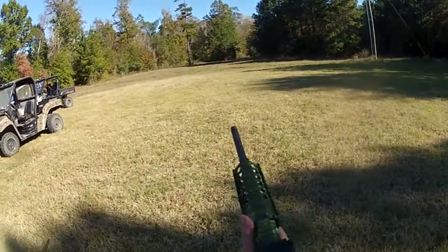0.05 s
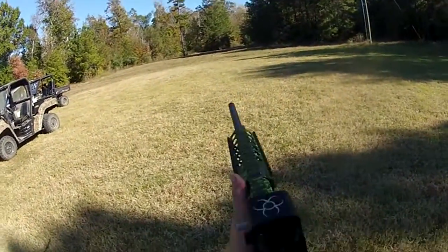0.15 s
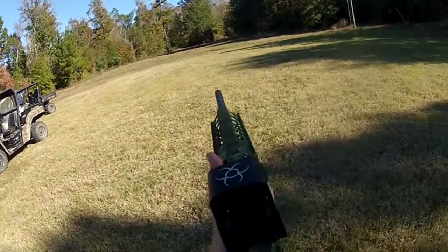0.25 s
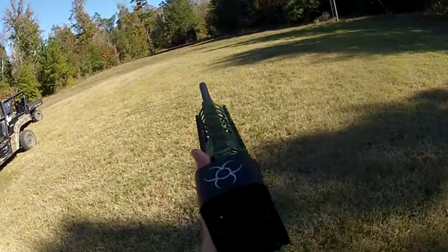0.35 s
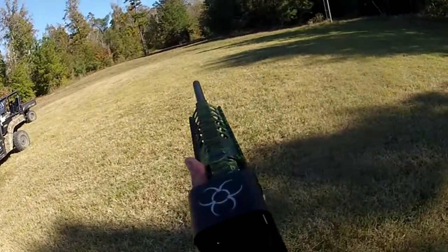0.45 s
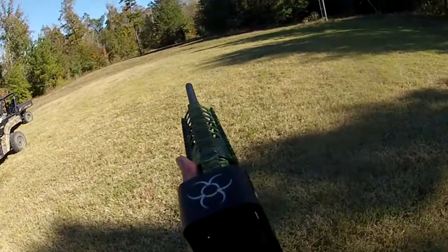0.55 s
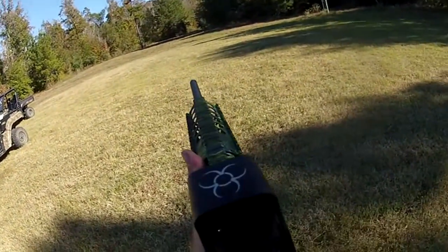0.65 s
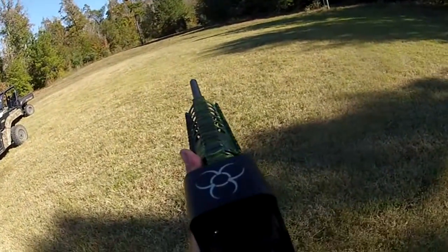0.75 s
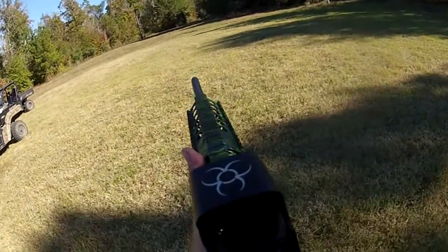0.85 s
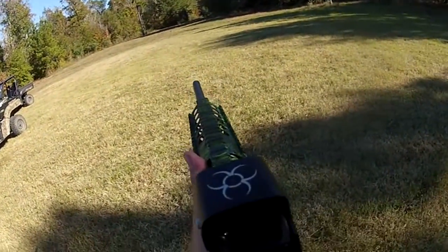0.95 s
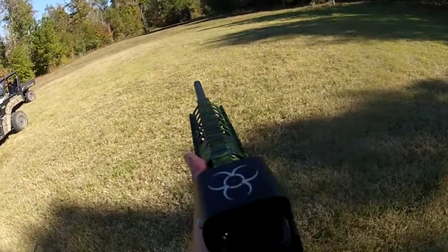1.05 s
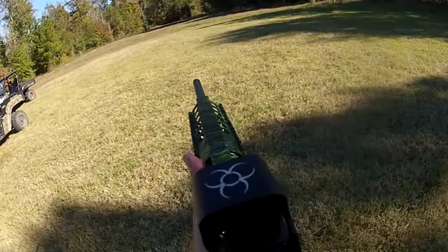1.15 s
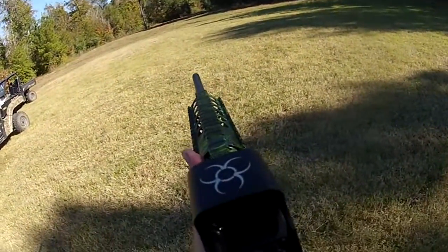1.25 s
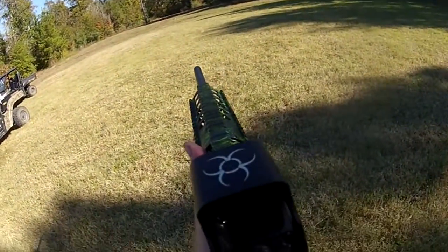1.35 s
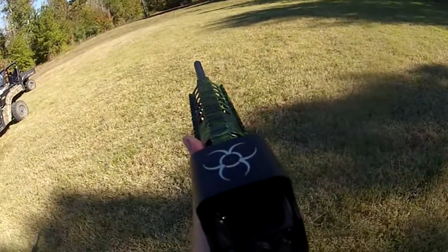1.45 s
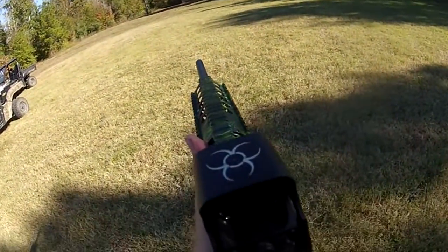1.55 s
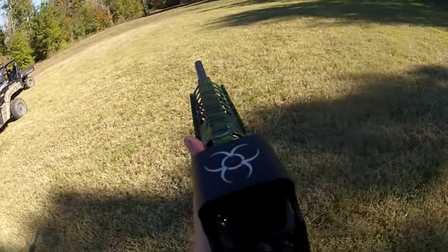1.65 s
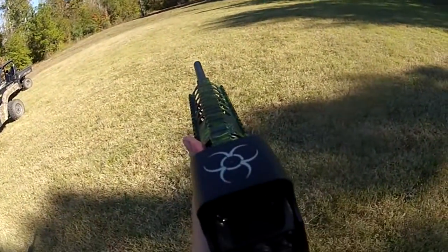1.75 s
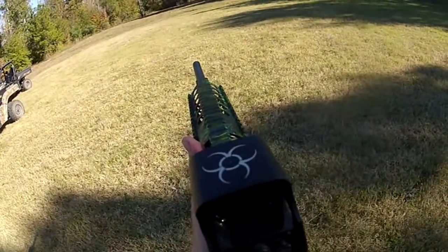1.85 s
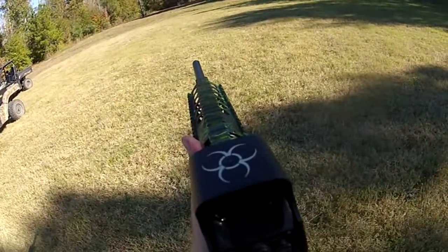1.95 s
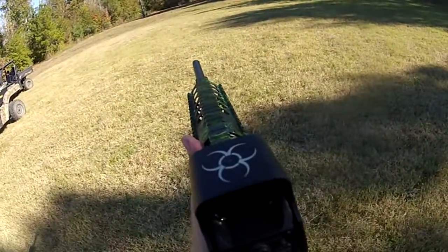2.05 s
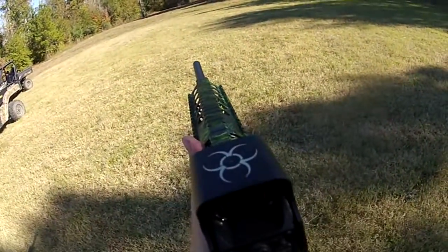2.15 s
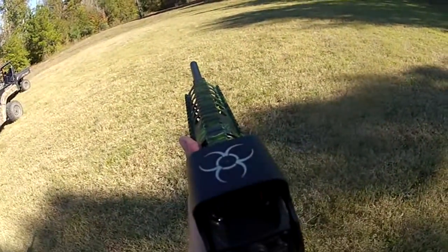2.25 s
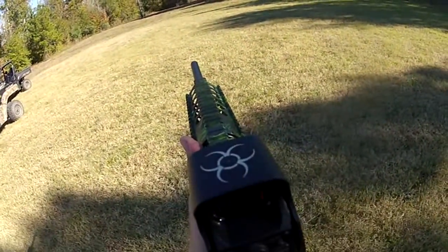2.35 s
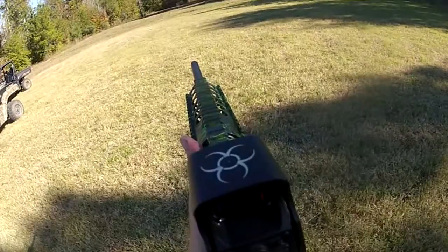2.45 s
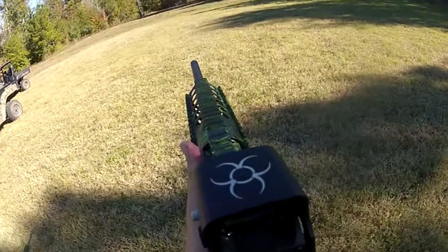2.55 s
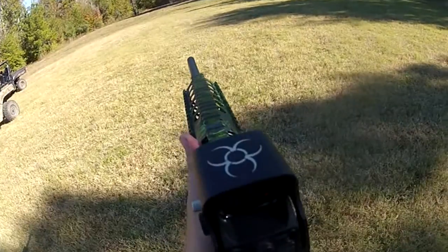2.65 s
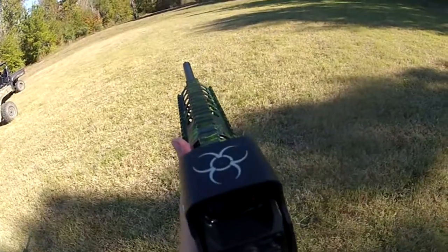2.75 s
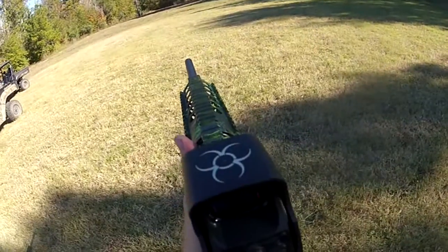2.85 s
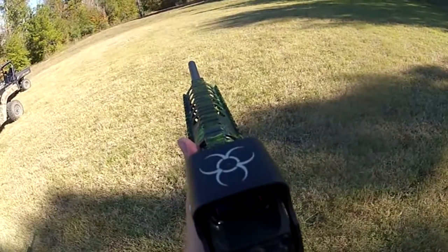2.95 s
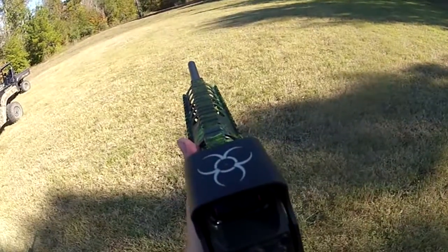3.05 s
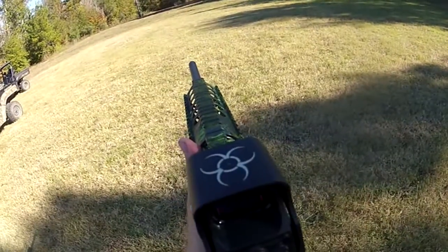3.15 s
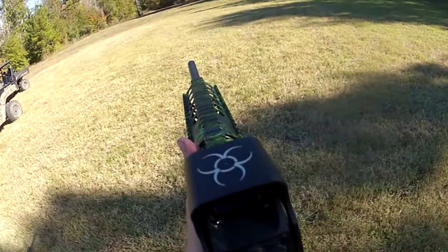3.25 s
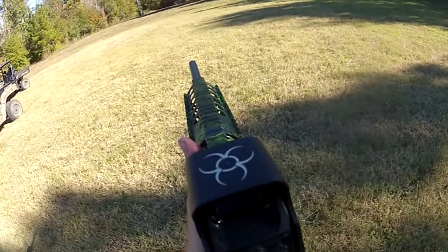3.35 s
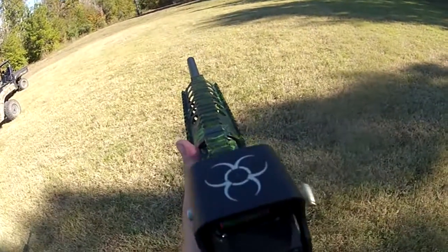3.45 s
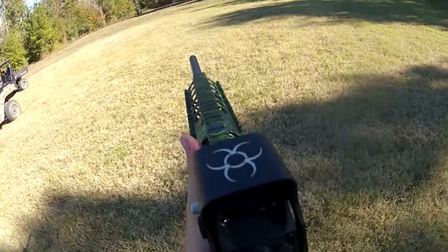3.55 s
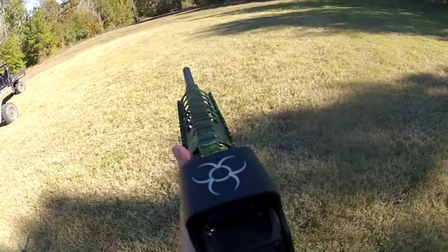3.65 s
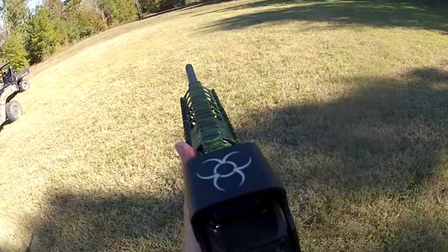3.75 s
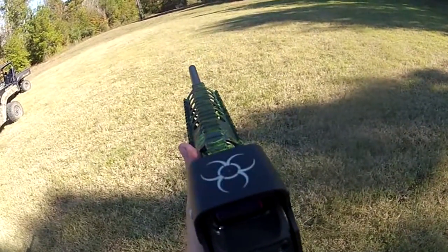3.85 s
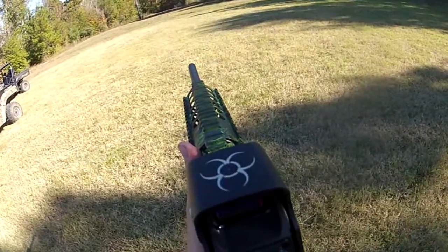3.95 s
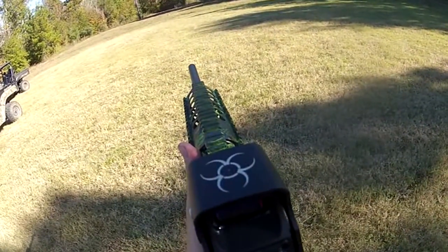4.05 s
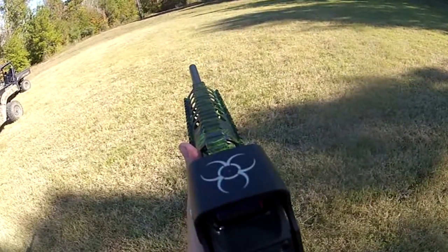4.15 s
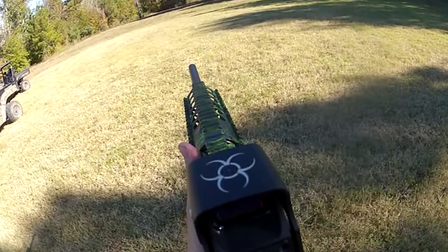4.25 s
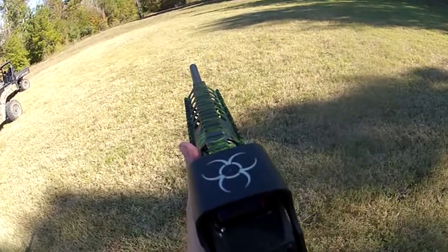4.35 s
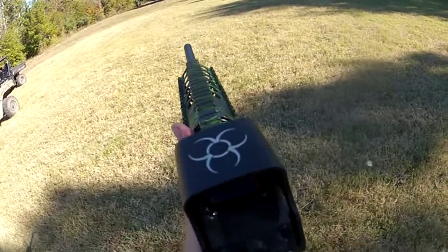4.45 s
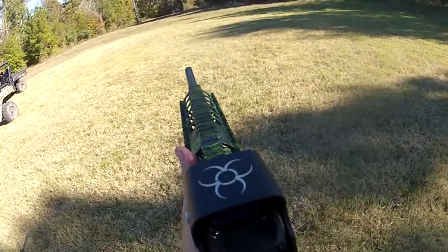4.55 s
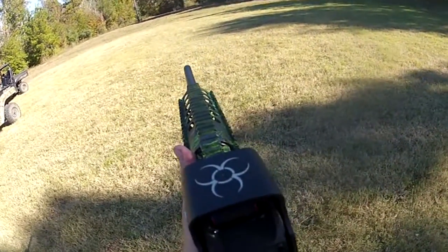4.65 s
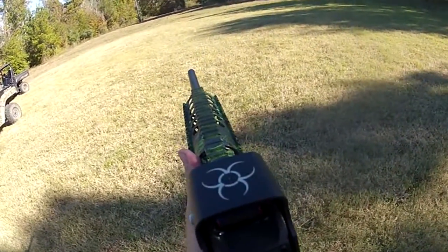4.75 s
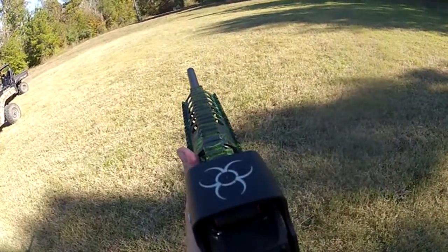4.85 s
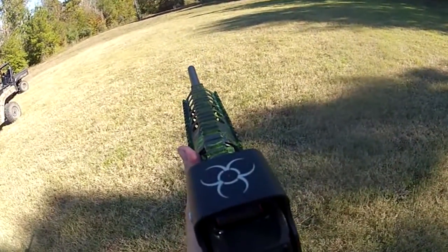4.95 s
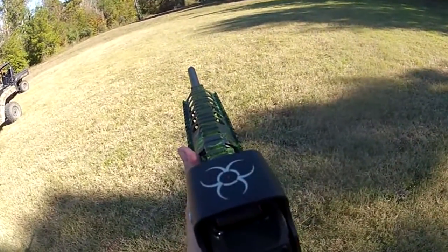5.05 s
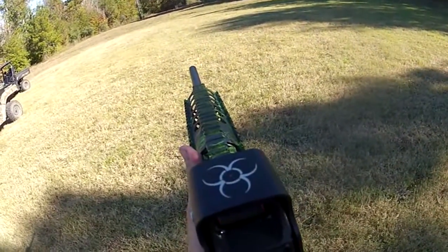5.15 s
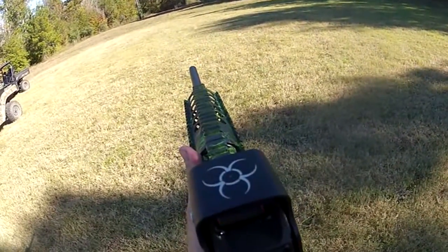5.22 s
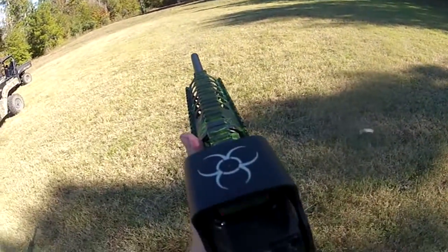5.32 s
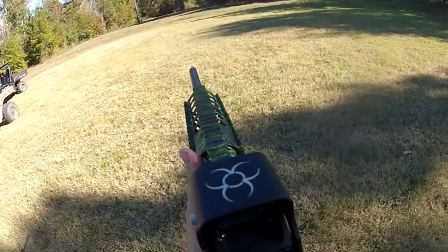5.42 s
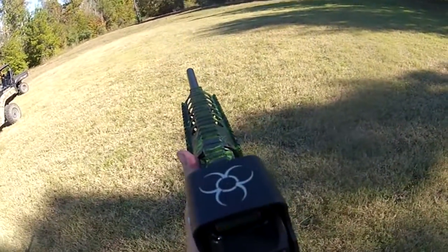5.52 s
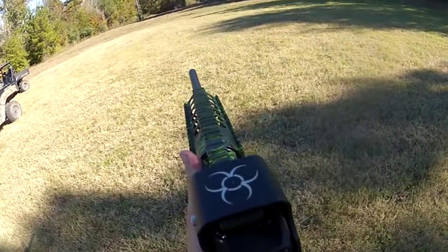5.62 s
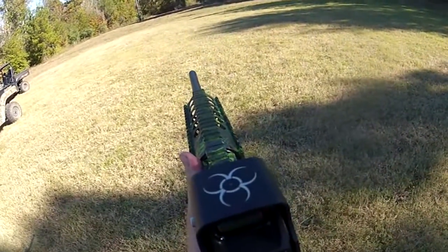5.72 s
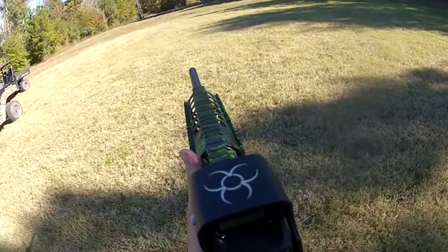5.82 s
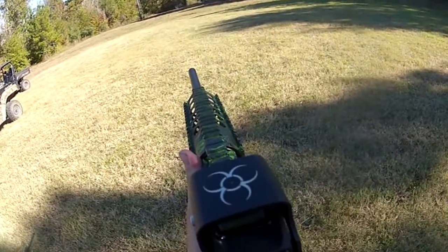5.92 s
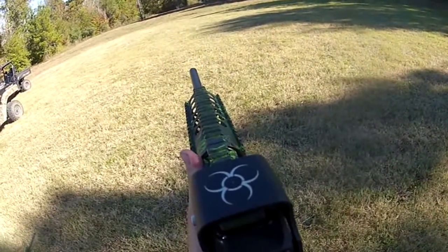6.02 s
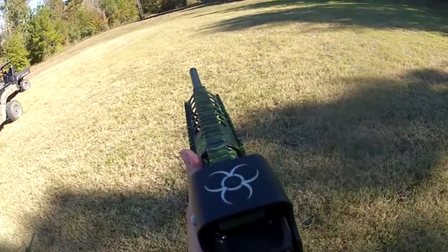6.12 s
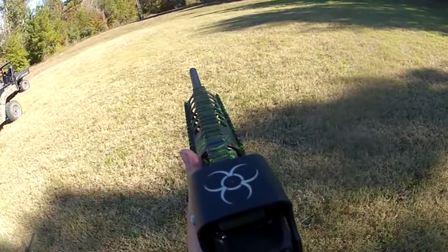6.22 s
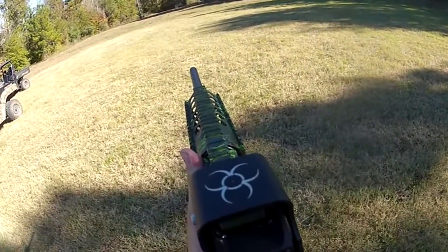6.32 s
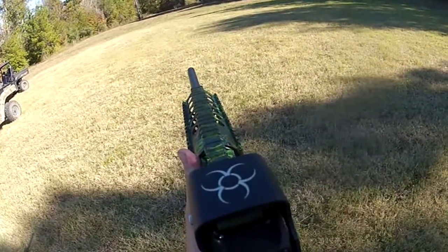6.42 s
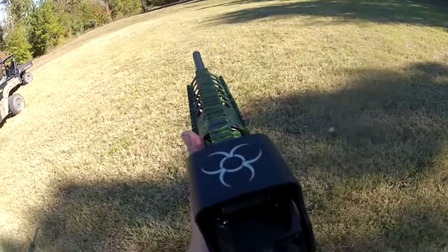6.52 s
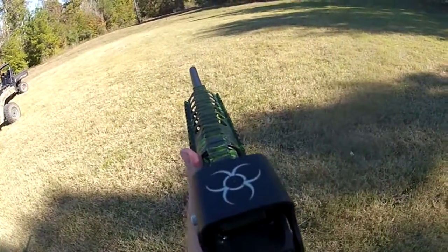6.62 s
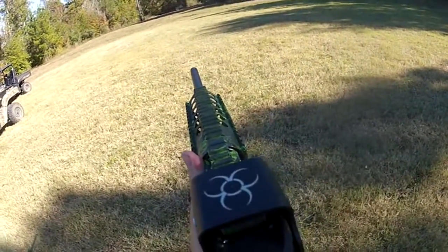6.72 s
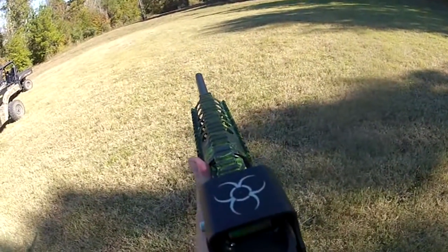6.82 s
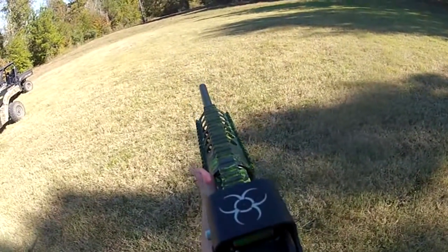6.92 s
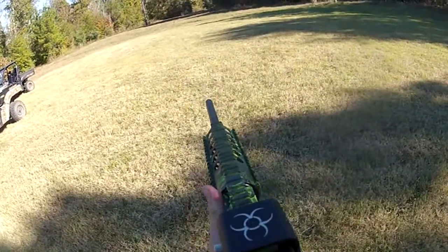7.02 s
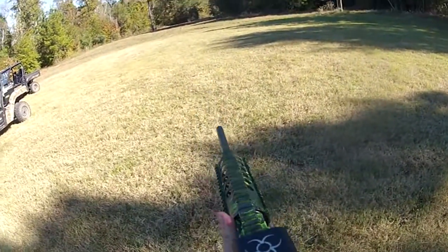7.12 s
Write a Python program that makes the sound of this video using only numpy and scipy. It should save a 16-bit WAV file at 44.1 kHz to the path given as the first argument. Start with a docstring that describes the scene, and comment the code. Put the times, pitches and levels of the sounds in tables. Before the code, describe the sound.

Faint wind rumbles over an open field, with a soft tap and a few small clicks as a rifle is raised. After a pause, the self-loading rifle fires five single shots about a second apart, right in front of a body-worn microphone. Each sharp blast overloads slightly and is followed by the metallic rattle and clack of the bolt, then a long echo from the tree line that dulls as it fades.

```python
"""A light wind rumbles over a mown field. A hand taps a rifle stock; the safety catch ticks.
From 2.6 s the self-loading rifle fires five single shots right in front of a body-worn camera.
Each blast overloads the recorder and the recoil jolts the camera; the bolt runs back, rattles, slams home.
A quarter second after each shot the tree line returns a long echo that dulls as it rolls away."""
import sys
import numpy as np
from scipy import signal
from scipy.fft import rfft, irfft, next_fast_len
from scipy.io import wavfile

SR = 44100
rng = np.random.default_rng(int(sys.argv[2]) if len(sys.argv) > 2 else 0)


def unload_wav(signal):
    """Save mono or channel-first audio to the path in sys.argv[1] as 16-bit WAV at rate SR, clipped to [-1, 1]."""
    wavfile.write(
        sys.argv[1],
        SR,
        np.round(np.clip(np.atleast_2d(signal).T, -1, 1) * 32767).astype(np.int16),
    )


N = 316638
HOLD_HZ = 12000  # recorder's sample-and-hold rate
HZ = np.fft.rfftfreq(4096, 1 / SR)  # grid of the filter curves

# shots: t/s, blast level/dB, blast length/s, boom lift/dB, boom f/Hz, echo level/dB, slap level/dB
SHOTS = [(2.5983, 2, 0.0082, 10.5, 240, 6.5, -3.5), (3.4994, 6.5, 0.0084, 7, 290, 7.5, -6),
         (4.432, 1.5, 0.0073, 14, 104, 9, -2), (5.3219, 2, 0.0081, 14.5, 83.3, 7.5, 1),
         (6.515, 0.5, 0.0096, 4, 590, 7.5, -4.5)]
# bolt slamming home: t/s, level/dB, chatter length/s
SLAMS = [(2.7315, -5, 0.01), (3.6343, -6, 0.011), (4.573, -4.5, 0.0064), (5.4588, -4.5, 0.0081),
         (6.6557, -4.5, 0.0082)]
# camera housing resonances: f/Hz, width/Hz, lift/dB
HOUSING = [(974, 250, 10), (1282, 170, 15), (1793, 190, 11.5), (2190, 285, 9), (2419, 253, 14.5),
           (3445, 210, 5)]


def amp(db):
    return 10 ** (np.asarray(db) / 20)


def unit(x):
    return x / np.sqrt(np.mean(x ** 2) + 1e-20)


def curve_db(points):
    """Spectrum on HZ, interpolated over log frequency."""
    hz, db = np.transpose(points)
    return np.interp(np.log(HZ + 1), np.log(hz + 1), db)


def resonance_db(modes):
    """Summed lift of resonances on HZ."""
    return sum(db / (1 + (2 * (HZ - hz) / width_hz) ** 2) for hz, width_hz, db in modes)


def colour(x, db):
    """Minimum-phase filter; white noise keeps its power."""
    log_gain = np.log(unit(amp(db)))
    log_response = np.conj(signal.hilbert(np.r_[log_gain, log_gain[-2:0:-1]]))
    taps = np.fft.ifft(np.exp(log_response)).real
    return signal.oaconvolve(x, taps)[:len(x)]


def lowpass(x, hz, size):
    """Steep FIR low-pass per channel."""
    taps = signal.firwin(size, hz, window=("kaiser", 8), fs=SR)
    return signal.oaconvolve(x, taps[None], "same", axes=1)


def wander(length, rate_hz):
    """Smooth random curve, RMS 1."""
    step = np.arange(length) * rate_hz / SR
    return unit(np.interp(step, np.arange(4000), rng.standard_normal(4000)))


def add(mix, start_s, sound):
    part = mix[max(round(start_s * SR), 0):][:len(sound)]
    part += sound[:len(part)]


def burst(hold_s, decay_s):
    """Dense tiny impacts: level, then decaying."""
    t = np.arange(SR // 8) / SR
    return rng.choice([-1., 1.], len(t)) * np.exp(-np.maximum(t - hold_s, 0) / decay_s)


def shot_noise(spectrum, gain_db, decay_s):
    """Decaying noise from the instant of each shot."""
    out, t = np.zeros(N), np.arange(2 * SR) / SR
    for shot_s, *_ in SHOTS:
        add(out, shot_s, amp(gain_db) * np.exp(-t / decay_s) * rng.standard_normal(len(t)))
    return colour(out, curve_db(spectrum))


def touches(events, spectrum, gain_db, decay_s):
    """One short click per event."""
    out = np.zeros(N)
    for start_s, db in events:
        add(out, start_s, amp(db + gain_db) * burst(0, decay_s))
    return colour(out, curve_db(spectrum))


def blasts(gain_db=5, rise_s=0.001, fall_s=0.0009, ring_db=-20, ring_decay_s=0.012, boom_octaves=0.6):
    """Turbulent gas bursts from the muzzle, rings briefly and shakes the camera housing."""
    gas_spectrum = [(30, -7), (90, 5), (300, 0.5), (650, -6), (1200, -8.5), (2400, -1), (3200, 2),
                    (5600, 4.5)]  # f/Hz, level/dB
    out, t = np.zeros(N), np.arange(SR // 8) / SR
    for shot_s, db, length_s, boom_db, boom_hz, *_ in SHOTS:
        lift_db = boom_db / (1 + (np.log2((HZ + 1) / boom_hz) / boom_octaves) ** 2)
        shape_db = curve_db(gas_spectrum) + resonance_db(HOUSING) + lift_db
        gas = colour(rng.standard_normal(2 * len(t)), shape_db)[len(t):]
        onset = np.minimum(t / rise_s, 1) ** 2
        after_s = np.maximum(t - length_s, 0)
        release = np.exp(-after_s / fall_s) + amp(ring_db) * np.exp(-after_s / ring_decay_s)
        add(out, shot_s, amp(db + gain_db) * onset * release * gas)
    return out


def action(contact_s=0.0032, hammer_lead_s=0.007, unlock_lead_s=0.012, bounce_loss_db=7, chatter_db=2):
    """The hammer falls; the bolt unlocks, bounces at the rear stop, slams home; the spring rings."""
    # buffer hitting the rear stop: t/s, level/dB, bounce interval/s
    knocks = [(2.6413, -15.5, 0.02), (3.541, -14, .019), (4.475, -18, .019), (5.3616, -16, 0.02),
              (6.5549, -14, 0.023)]
    # bolt and receiver resonances: f/Hz, width/Hz, lift/dB
    steel_modes = [(2320, 100, -14), (3054, 160, 10), (3860, 49, -0.5), (3707, 106, 7), (4070, 890, 10.5),
                   (4690, 130, -0.5), (4800, 111, -14)]
    clack_spectrum = [(60, 1), (250, -1.5), (600, -21), (1500, -12.5), (2200, 3), (2800, 2), (4000, -3.5),
                      (5600, -2)]  # f/Hz, level/dB
    spring_spectrum = [(60, -45.5), (2800, -10.5), (3800, -31), (5300, 17), (5700, 8)]  # f/Hz, level/dB
    steel, spring = np.zeros((2, N))
    for shot_s, *_ in SHOTS:
        add(steel, shot_s - hammer_lead_s, amp(-19) * burst(contact_s, decay_s=0.0017))
    for knock_s, db, bounce_s in knocks:
        for part, unlock_db in (steel, -29), (spring, -22.5):
            add(part, knock_s - unlock_lead_s, amp(unlock_db) * burst(contact_s, decay_s=0.019))
        for k in range(3):
            hit_s, hit_db = knock_s + k * bounce_s, db - k * bounce_loss_db
            for part, part_db in (steel, 0), (spring, -2):
                add(part, hit_s, amp(hit_db + part_db) * burst(contact_s, decay_s=0.0071))
    for slam_s, db, chatter_s in SLAMS:
        blow = burst(chatter_s, decay_s=0.011) + amp(4) * burst(0.001, decay_s=0.002)
        uneven_db = chatter_db * wander(len(blow), rate_hz=690)
        add(steel, slam_s, amp(db - 12 + uneven_db) * blow)
    steel_db = curve_db(clack_spectrum) + resonance_db(steel_modes) + resonance_db(HOUSING)
    return colour(steel, steel_db) + colour(spring, curve_db(spring_spectrum))


def recoil(kick_db=-24, kick_hz=46, kick_s=0.057, sway_db=-18.5, sway_hz=30, sway_s=0.022, lead_s=0.02):
    """The kick shakes the camera; a slower lurch follows as the bolt runs forward."""
    out, t = np.zeros(N), np.arange(SR // 3) / SR
    for (shot_s, *_), (slam_s, *_) in zip(SHOTS, SLAMS):
        kick = np.sin(2 * np.pi * kick_hz * t) * np.exp(-(t / kick_s) ** 2)
        from_peak_s = t - (slam_s - shot_s - lead_s)
        sway = -np.cos(2 * np.pi * sway_hz * from_peak_s) * np.exp(-(from_peak_s / sway_s) ** 2)
        add(out, shot_s, amp(kick_db) * kick + amp(sway_db) * sway)
    return out


def buffeting():
    """The pressure wave hits the two microphone ports unequally."""
    puff_spectrum = [(20, 7), (100, 7.5), (400, -4.5), (1500, -26.5), (5500, -12.5)]  # f/Hz, level/dB
    return shot_noise(puff_spectrum, gain_db=-12, decay_s=0.0053)


def tree_echo(gain_db=-1, clump_db=1.2, clump_hz=130, grain_db=0.5, grain_hz=1500):
    """Countless trunks and crowns return the blast; air takes more treble from longer paths."""
    # tree stands, near to far: delay/s, level/dB, swell/s, fade/(dB/s)
    stands = [(0.151, -37, 0.031, 6), (0.266, -22.5, .013, 68), (.437, -26, 0.033, 49.5),
              (.61, -32, 0.02, 32)]
    echo_spectrum = [(30, -35), (90, -43), (280, -6), (480, -14.5), (700, -1), (950, -2.5), (1500, 3),
                     (2200, 4.5), (3000, 9.5), (4200, 5), (5600, 8.5)]  # f/Hz, level/dB
    out, t = np.zeros(N), np.arange(2 * SR) / SR
    power = 0
    for delay_s, db, swell_s, fade_db_per_s in stands:
        arrival = np.exp(-(np.minimum(t - delay_s, 0) / swell_s) ** 2)
        power += arrival * amp(db - fade_db_per_s * np.maximum(t - delay_s, 0)) ** 2
    for shot_s, *_, echo_db, _ in SHOTS:
        uneven_db = clump_db * wander(len(t), clump_hz) + grain_db * wander(len(t), grain_hz)
        scatter = np.sqrt(power) * amp(uneven_db + echo_db + gain_db) * rng.standard_normal(len(t))
        hz, travel_s, frames = signal.stft(scatter, SR, nperseg=256)
        air_loss_db = 3 * (hz[:, None] / 1000) ** 1.516 * travel_s
        add(out, shot_s, signal.istft(frames * amp(-air_loss_db), SR, nperseg=256)[1])
    top_cut_db = 60 * (HZ > 0.6 * HOLD_HZ)
    return colour(out, curve_db(echo_spectrum) + resonance_db(HOUSING) - top_cut_db)


def trunk_slaps(gain_db=-11.5):
    """Single bare trunks throw each blast back as small, sharp slaps."""
    trunks = [(.26, -5.5), (.2805, -7.5), (.406, -10), (.438, -12), (.598, -21)]  # delay/s, level/dB
    slap_spectrum = [(100, -24), (600, -3), (1200, -12), (2400, 3.5), (3500, -5.5), (5600, -1.5),
                     (7000, -55)]  # f/Hz, level/dB
    out = np.zeros(N)
    for shot_s, *_, slap_db in SHOTS:
        for delay_s, db in trunks:
            add(out, shot_s + delay_s, amp(db + slap_db + gain_db) * burst(0.004, decay_s=0.0015))
    return colour(out, curve_db(slap_spectrum) + resonance_db(HOUSING))


def ground_roll():
    """The blast's bass scatters off open ground."""
    roll_spectrum = [(30, -20), (90, -3), (280, 1), (500, -4), (1200, -6.5), (5000, -35)]  # f/Hz, level/dB
    return shot_noise(roll_spectrum, gain_db=-43.5, decay_s=0.3)


def handling():
    """A hand taps the stock and the safety catch ticks as the rifle is raised."""
    stock_taps = [(0.322, -38)]  # t/s, level/dB
    tap_spectrum = [(60, -13), (600, -12), (1100, 10), (2000, -11), (5000, -31)]  # f/Hz, level/dB
    catch_ticks = [(0.3478, -26.5), (0.3545, -32), (0.4918, -36)]  # t/s, level/dB
    tick_spectrum = [(60, -11), (2000, -3.5), (3300, -5), (4200, 1), (5700, -3.5)]  # f/Hz, level/dB
    tap = touches(stock_taps, tap_spectrum, gain_db=-2, decay_s=0.0022)
    return tap + touches(catch_ticks, tick_spectrum, gain_db=-6, decay_s=0.0033)


def wind(gust_db=-2, gust_band_hz=(20, 60), breeze_db=-48, flutter_db=1):
    """Gusts rumble below a steady, slightly fluttering breeze."""
    gusts = [(0.0, -53), (0.14, -41), (0.65, -38), (0.96, -53), (1.01, -40.5), (1.92, -50), (2.5, -47)]  # t/s, level/dB
    breeze_spectrum = [(10, 1.5), (30, -18), (55, -7.5), (90, -14.5), (200, -12), (350, -17.5),
                       (700, -26.5), (1500, -39.5), (5000, -77.5)]  # f/Hz, level/dB
    flutter = amp(flutter_db * wander(N, rate_hz=12))
    breeze = flutter * colour(rng.standard_normal(N), curve_db(breeze_spectrum))
    gust_filter = signal.butter(3, gust_band_hz, "band", fs=SR, output="sos")
    rumble = unit(signal.sosfilt(gust_filter, rng.standard_normal(N)))
    strength_db = np.interp(np.arange(N) / SR, *np.transpose(gusts))
    return amp(strength_db + gust_db) * rumble + amp(breeze_db) * breeze


def port_eddies(level_db=-68):
    """Eddies that differ between the two ports."""
    eddy_spectrum = [(30, -3), (120, 4.5), (350, 2), (700, -9.5), (3000, -18.5)]  # f/Hz, level/dB
    return amp(level_db) * colour(rng.standard_normal(N), curve_db(eddy_spectrum))


def hiss(level_db):
    """Faint, even microphone noise."""
    hiss_spectrum = [(50, -31), (1000, 1.5), (2500, 1), (5500, -4)]  # f/Hz, level/dB
    return amp(level_db) * colour(rng.standard_normal(N), curve_db(hiss_spectrum))


def scene(jolt_side_db=-17):
    """Near mono; only buffeting, jolt, eddies and hiss differ between channels."""
    hands = handling()
    roll = ground_roll()
    buffet = buffeting()
    jolt = recoil()
    eddies = port_eddies()
    mid = blasts() + action() + jolt + roll + tree_echo() + trunk_slaps() + hands + wind() + hiss(-58.5)
    side = buffet + amp(jolt_side_db) * jolt + eddies + hiss(-83)
    return np.array([mid + side, mid - side])


def record(dry, gain_db=2, headroom=3.2, smooth_hz=13750, dull_hz=14000, edge_hz=15700):
    """The recorder saturates; its slow sample-and-hold mirrors mids into glassy treble; then it clips."""
    saturated = headroom * np.tanh(dry / headroom)
    narrow = lowpass(saturated, 0.486 * HOLD_HZ, size=201)
    mirrored = narrow * (1 + 2 * np.cos(2 * np.pi * HOLD_HZ * np.arange(N) / SR))
    size = next_fast_len(N)
    hold_droop = np.sinc(np.fft.rfftfreq(size, 1 / SR) / HOLD_HZ)
    held = irfft(rfft(mirrored, size) * hold_droop, size)[:, :N]
    clipped = np.clip(amp(gain_db) * lowpass(held, smooth_hz, size=201), -1, 1)
    dulled = signal.sosfilt(signal.butter(2, dull_hz, fs=SR, output="sos"), clipped)
    return lowpass(dulled, edge_hz, size=255)


dry = scene()
out = record(dry)
unload_wav(out)
```